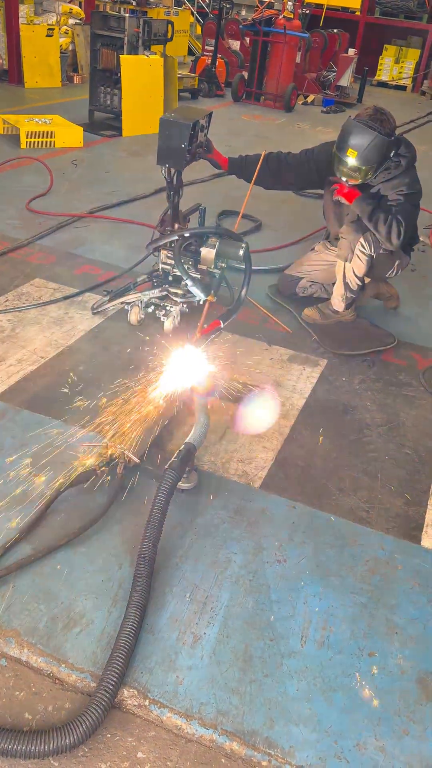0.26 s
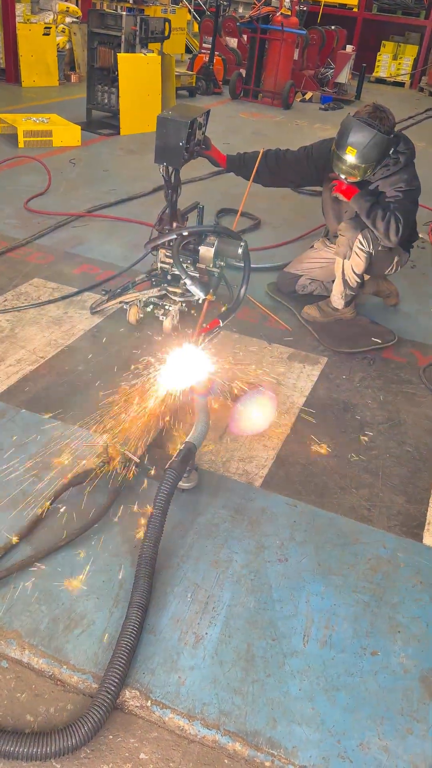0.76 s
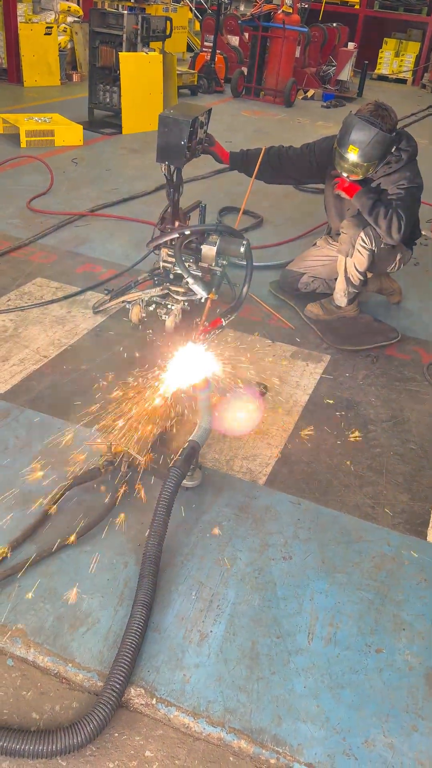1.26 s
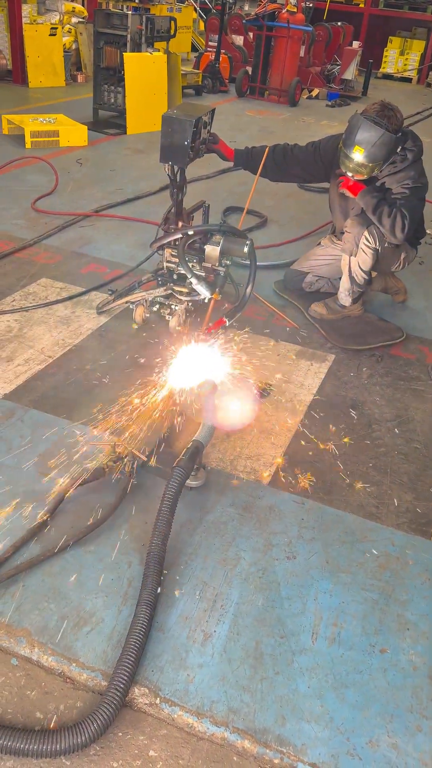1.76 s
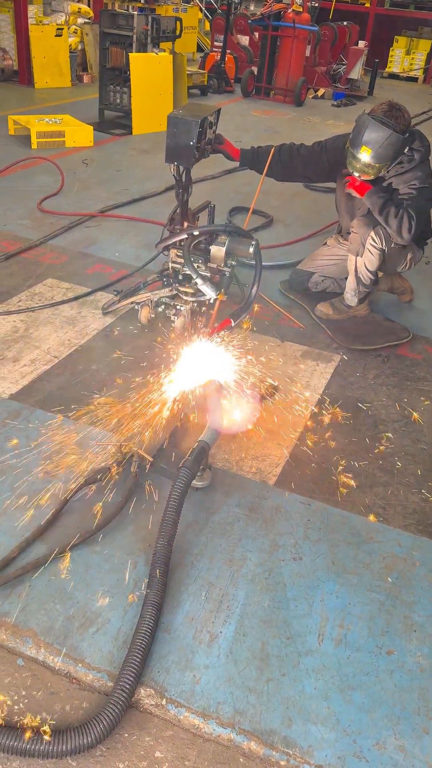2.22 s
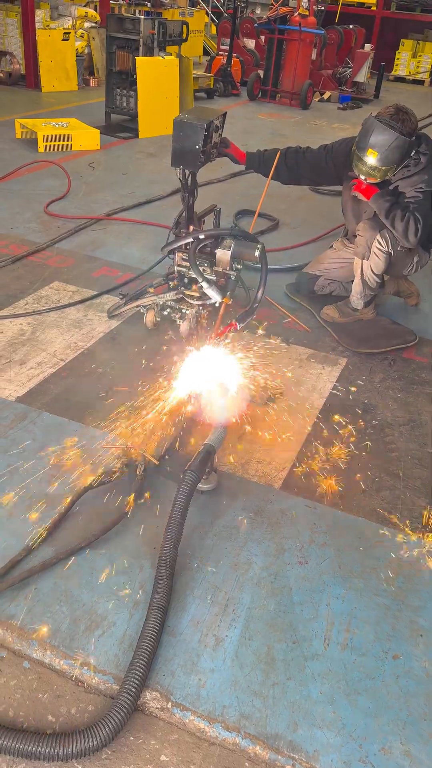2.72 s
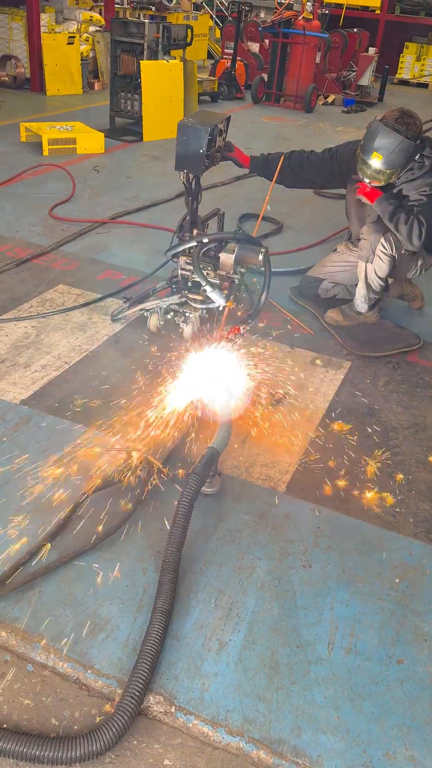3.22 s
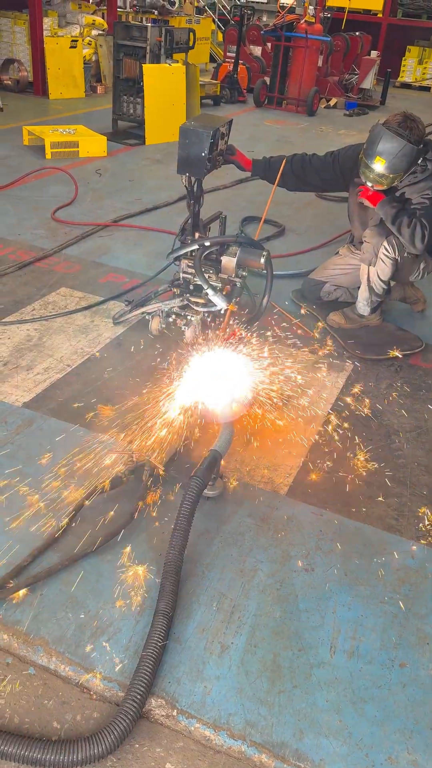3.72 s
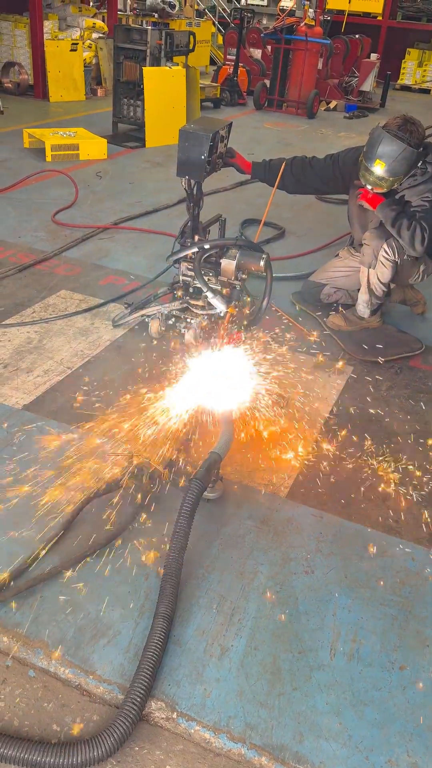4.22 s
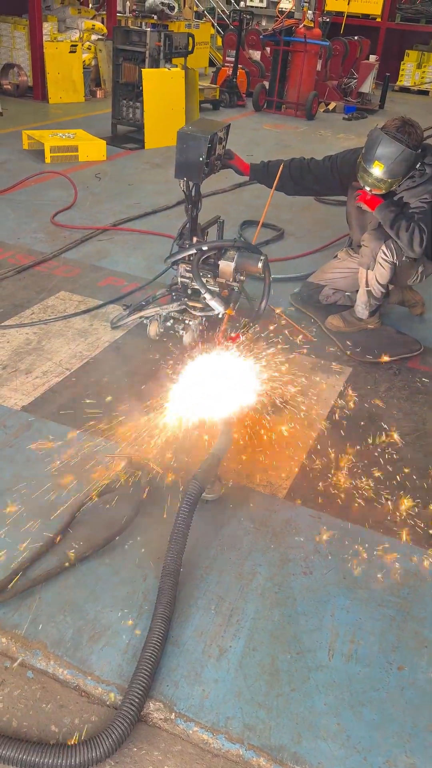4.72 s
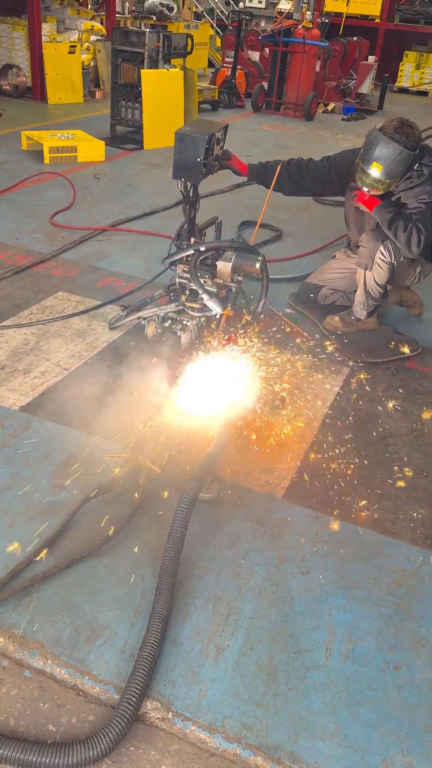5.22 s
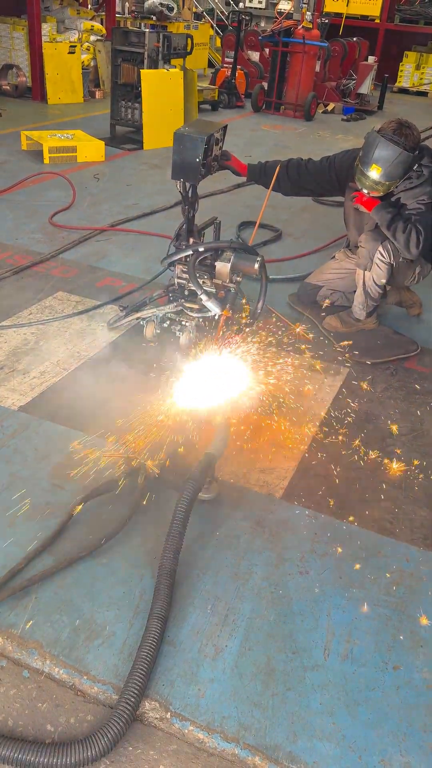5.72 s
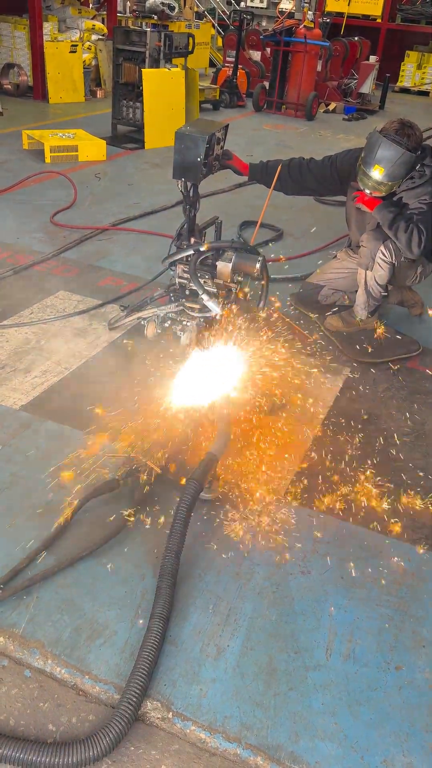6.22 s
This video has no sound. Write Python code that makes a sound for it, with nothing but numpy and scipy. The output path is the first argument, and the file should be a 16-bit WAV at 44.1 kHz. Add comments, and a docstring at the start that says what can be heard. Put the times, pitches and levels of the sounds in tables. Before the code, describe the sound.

Air-arc gouging on a steel plate, heard a few steps away in stereo in a large workshop. A harsh, dense crackle and bright air hiss run without pause from the start. Faint electrical hum and motor drone swell early beneath them. Sharp snaps join after a second, the sputter turns coarsest midway, then the arc eases and the rushing air is choked near the end, leaving a thinner crackle.

```python
"""Air carbon arc gouging on a steel plate in a workshop, a few steps from a pair of microphones.
From the start the hall rumbles, bursts of melt crackle in arc, groove and spray, and noise makes the air's roar.
Gusts swell the noisy roar, mostly early. A droning motor and the rectifier's ripple hum, both sine tones, also
swell early, the drone again later. Small spits run throughout; after a second loud snaps join in, clicks with a
fizz. The melt is coarsest in mid cut; then the arc eases and the groove's air is choked for a second as smoke rises."""
import sys
import numpy as np
from scipy import signal
from scipy.fft import rfft, irfft, next_fast_len
from scipy.io import wavfile

SR = 44100
rng = np.random.default_rng(int(sys.argv[2]) if len(sys.argv) > 2 else 0)


def wav_record(signal):
    """Record a signal, one row per channel, as 16-bit PCM in the file named by sys.argv[1]."""
    frames = np.transpose(np.atleast_2d(signal))
    bounded = np.clip(frames, -1, 1)
    # unit amplitude maps onto the largest positive 16-bit level
    quanta = np.round(bounded * 32767).astype(np.int16)
    wavfile.write(sys.argv[1], SR, quanta)


N = 285327
TIME = np.arange(N) / SR
SIZE = next_fast_len(N + SR)
HZ = np.maximum(np.arange(SIZE // 2 + 1) * SR / SIZE, 1)

# Source levels are before the trims in scene(); each source spectrum is a shape, scaled to unit rms.
# how hard the arc burns, easing as the cut goes on: t/s, level/dB
BURN = [(0.0, -18.5), (1.2, -19.5), (1.32, -20), (1.65, -19.5), (1.95, -20), (2.2, -22.5), (3.1, -22.5),
        (3.4, -22), (3.75, -23), (4.15, -23), (4.7, -25), (5.1, -25), (5.55, -27.5), (5.85, -26.5),
        (6.2, -27), (6.47, -28)]
# the arc flares as it bites into fresh steel: t/s, rise/dB, length/s
FLARES = [(.115, 2, 0.11), (.36, 1.5, .03), (.407, 1.5, .03), (.762, 1.5, .052), (1.16, 1.7, .07),
          (1.212, 2.5, .025), (1.636, 2, 0.049), (2.122, 3.5, .04), (2.465, 3.3, 0.12), (2.578, 1, .035),
          (2.635, 0.5, .04), (2.71, 1.7, 0.03), (2.786, 2.5, .02), (3.405, 2.5, .028), (3.53, 2.5, 0.049),
          (3.594, 3, .018), (3.628, 2, .018), (3.666, 2.5, .02), (3.712, 6.5, 0.016), (3.785, 4.5, .025),
          (3.83, 4, .02), (4.07, 1, .025), (4.324, 1, .15), (4.618, 3, .02), (5.198, 3, .045),
          (5.494, 3.5, .04), (5.723, 3.5, .03), (5.84, 1.3, 0.15), (6.11, 0, .1)]
# the arc falters as its gap widens: t/s, change/dB, length/s
FALTERS = [(.02, -1.5, 0.049), (.185, -0.5, .03), (.305, -3, 0.049), (.694, -1.5, .045), (1.095, -2.5, .03),
           (1.283, -3.5, .055), (1.471, -1.5, .03), (2.043, -2.5, .065), (2.36, -1.5, .06),
           (2.536, -4.5, 0.058), (2.848, -2.5, .065), (3.151, -1.5, .065), (3.454, -2, 0.092),
           (3.94, -2.5, .04), (4.099, -2.5, 0.031), (4.177, -4, .065), (4.422, -3.5, 0.078),
           (4.723, -1.5, 0.11), (5.356, -3, 0.05), (5.444, -2.5, .045), (5.545, -3, .07), (5.66, -1, .03),
           (5.974, -1, .03), (6.24, -2, 0.13)]
# how coarsely the melt sputters, most in mid cut: t/s, factor on the share of bursts/1
COARSENESS = [(0, 0.77), (1.5, 0.97), (2.6, 1.27), (3.6, 1.33), (4.4, 1.05), (5.2, 1.03), (6.47, 0.9)]
# the jet, choked for a second as smoke rises: t/s, level of air rushing in the groove/dB, level of spray hiss/dB
JET = [(0, -21, -23.5), (.25, -25, -26), (1.9, -25, -26.5), (2.2, -28.5, -27), (2.36, -31, -27.5),
       (2.46, -28, -27), (3.1, -28.5, -28), (3.55, -27, -27), (4.0, -28.5, -29.5), (4.36, -29, -28.5),
       (4.41, -30, -31), (4.5, -27.5, -30.5), (4.65, -30, -30), (5.03, -27.5, -27.5), (5.25, -39, -31),
       (5.33, -32, -29.5), (5.5, -51, -33), (5.55, -44, -33), (5.63, -43, -30.5), (5.85, -38, -31),
       (6.05, -39, -32.5), (6.2, -38, -31.5), (6.28, -34, -31), (6.34, -33, -30), (6.47, -38, -31.5)]
# top treble of the spray, relative: t/s, level/dB
FINENESS = [(0, -6), (1.5, -4.5), (2.5, -2.5), (3.0, -4), (3.8, -4.5), (4.4, -8), (5.0, -6.5), (5.6, -8),
            (6.47, -8)]
# roar of the air stream: t/s, level/dB
ROAR = [(0, -35.5), (1.2, -37.5), (1.3, -38.5), (1.95, -38.5), (2.1, -41), (2.8, -39.5), (3.1, -41.5),
        (3.45, -39.5), (3.65, -39.5), (4.15, -41), (4.35, -41), (5.0, -41), (5.5, -41.5), (5.8, -42),
        (6.15, -42.5), (6.33, -40), (6.47, -43)]
# gusts in the air stream: t/s, rise/dB, length/s
GUSTS = [(.12, 1.5, .08), (.62, 2.5, .07), (.76, 1, .04), (1.04, 3.5, .07), (4.59, 2.5, .07)]
# swells of the motor's drone: t/s, rise/dB, length/s
DRONE_SWELLS = [(.15, 9, .15), (.8, 7, .25), (1.54, 11, .3), (3.02, 6, .14), (3.38, 3, .25), (4.47, 4, .2)]
# hum of the rectifier's ripple: t/s, level/dB
HUM = [(0, -55), (.25, -51.5), (.72, -54.5), (.8, -49), (1.23, -50), (1.3, -58), (1.42, -55.5),
       (1.95, -57.5), (2.15, -64), (3.2, -62), (3.45, -61), (4.1, -59.5), (4.5, -66), (4.95, -60),
       (5.5, -69), (5.85, -66), (6.47, -63)]
# loud snaps of the arc, before the band filter: t/s, level/dB
SNAPS = [(1.0587, -4), (1.1164, -4), (1.214, -5), (1.4866, -4), (1.9904, -4), (2.1147, -2), (2.1246, -3),
         (2.2244, 1), (2.2584, -6), (2.4686, 0), (2.6192, -3), (2.6276, -3), (2.6494, -5), (2.7078, -2),
         (2.7869, -4), (3.0154, -4), (3.3256, -6), (3.408, -4), (3.4158, -4), (3.4668, -3), (3.5087, -6),
         (3.5199, -3), (3.555, 3), (3.5765, -3), (3.5947, -7), (3.6667, -2), (3.7087, -5), (3.7923, -4),
         (3.8965, 0), (4.0276, -4), (4.05, -4), (4.0595, -5), (4.2214, -5), (4.5746, -6), (4.6174, -10),
         (4.9, -5), (5.0846, -5), (5.5024, -8), (5.5996, -8)]
# colour of the low hall rumble: f/Hz, density/dB per Hz
RUMBLE_SPECTRUM = [(20, -30), (50, -7), (80, -1), (130, -3), (190, 1), (270, -6), (600, -28)]
# colour of the arc: f/Hz, density/dB per Hz
ARC_SPECTRUM = [(150, -50), (500, -28), (1000, -16.5), (1400, -13), (2100, -1.1), (2600, -0.5), (3000, 1.1),
                (4200, -0.84), (5000, -11.5), (5600, -3), (7000, -8), (16000, -29.5)]
# colour of the air in the groove: f/Hz, density/dB per Hz
GROOVE_SPECTRUM = [(500, -69), (3500, -36.5), (4800, 1), (5500, 3), (5900, 2), (6500, 0.5), (7200, -12.5),
                   (9000, -22)]
# colour of the steel spray: f/Hz, density/dB per Hz
SPRAY_SPECTRUM = [(300, -55), (2500, -22), (5000, -7), (7200, -2.5), (8700, 0), (9700, -.7), (11000, -.7),
                  (12200, -3.5), (13400, -6.5), (15000, -2), (16000, -2)]
# colour of the air stream: f/Hz, density/dB per Hz
STREAM_SPECTRUM = [(15, -50), (30, -29), (50, -14), (90, -12), (160, -5.5), (250, -8), (350, -2.5),
                   (600, 2), (900, 0.5), (1400, 4), (3000, -18.5)]
# peaks and dips from plate, carriage and floor:
# f/Hz, width/Hz, level with short groove/dB, level with long groove/dB, glide over the cut/Hz
SURROUNDINGS = [(434, 39, 5.5, 3, -2), (510, 40, -4.0, -0.5, 11), (660, 42, -4.5, -3.0, -9),
                (820, 290, 2.5, 5, 79), (1006, 100, -5, -7, 30), (1230, 45, 2.0, 4, -40),
                (1313, 130, 5, -1, -35), (1416, 52, -6.5, 3, 19), (1530, 58, 6.5, 5, -18),
                (1687, 62, 3, 7, -87), (1780, 67, -1, -0.5, -54), (1962, 83, -1, 6.5, -163),
                (1988, 71, 5.5, 4, -34), (2152, 47, -2, 6, -26), (2357, 55, 2, 4, -28),
                (2530, 41, 2.5, 0, 5), (2765, 260, 3.0, 2.5, 34), (2925, 77, 2.0, 3, -11),
                (3101, 106, -3.5, -6, -46), (3330, 200, 3, 2.0, 98), (3710, 93, 2.5, -4, -93),
                (4030, 87, 3, 1.5, 45), (4170, 2100, -3.5, 1.5, 1777), (4552, 202, 5, 2.5, 152),
                (4640, 152, 0.5, -2.5, 224), (4930, 149, -5, 3, -41), (5900, 207, 1.5, -2.5, 126),
                (6280, 130, -4, 3.5, 56), (7112, 301, -0.5, -1, -688), (7192, 112, 0.5, 0, -399),
                (7466, 74, -3.5, 5, 25), (7700, 940, -3.0, -1.0, -256), (9562, 250, -2, 2.5, -305)]
# near reflections that move with the torch: delay/s, delay gained over the cut/s, start gain/1, end gain/1
ECHOES = [(.002421, .00005, .13, -.03), (.00251, .000084, -.1, .04), (.00283, .00005, -.03, -.02),
          (.00315, .00025, .02, .05), (.0128, .0002, .08, .08)]
# microphone pair: f/Hz, left minus right level/dB, coherence/1, left lead/rad
PAIR = [(200, 0, 1, 0), (500, -1.4, .98, 0), (900, -3.6, .95, 0), (1400, -1.8, .95, .1),
        (2100, -2.4, .93, .15), (2700, 1.2, .85, .7), (3200, 3.3, .68, .15), (4200, 2.6, .8, -.5),
        (4700, 1, .6, -1.2), (5030, 3, .25, -2.4), (5250, 1, .55, -.25), (5700, 0, .97, -.05),
        (6700, 0, .96, -.15), (7300, 0, .85, -.7), (10800, 0, .88, -2.45), (11900, 0, .97, -3.05),
        (13700, 0, .97, -3.2), (15300, 0, .84, -4.2)]

GROOVE_FLARES, SPRAY_FLARES, ROAR_FALTERS = 0.4, 0.21, 0.55  # share of a flare or falter each part takes up
BODY_HZ, BODY_LOSS_DB = 2150, 7  # the arc's lower body: upper edge, and loss per unit of coarseness above 1
MAINS_HZ, MOTOR_HZ, FAN_HZ = 49.95, 97.17, 335.5
THROB_S = 3.03  # where the tones nearly align in phase, so that motor and mains hum swell together
WANDER_HZ = 14
HUM_BLUR = .3  # how much a coarse melt roughens the hum
SNAP_S, SNAP_FIZZ = 0.00062, 0.63  # fizz after a snap: decay time in s, and factor on its size
FLARE_SPITS = 2.5  # dB more spits a second for each dB of flare
FLURRY_HZ, FLURRY_DB = 69.8, 7.5  # how fast and how far the rate of spits swings
SHOP_T60_S = 0.76
CUTOFF_HZ = 15750


def from_db(db):
    """Decibels to gain."""
    return 10 ** (np.asarray(db) / 20)


def rms_one(x):
    """Scale to unit rms."""
    return x / np.sqrt(np.mean(x ** 2) + 1e-20)


def in_time(rows):
    """Each column of a curve at every sample."""
    s, *columns = np.transpose(rows)
    return [np.interp(TIME, s, c) for c in columns]


def in_frequency(rows):
    """Each column of a spectrum at every frequency, interpolated over log frequency."""
    hz, *columns = np.transpose(rows)
    return [np.interp(np.log(HZ), np.log(hz), c) for c in columns]


def filtered(x, response):
    """Pass a signal through a frequency response."""
    return irfft(rfft(x, SIZE) * response, SIZE)[..., :N]


def causal(db):
    """Minimum-phase response for a gain curve: it rings only after the cause."""
    cepstrum = irfft(np.log(from_db(db)), SIZE)
    cepstrum[1:SIZE // 2] *= 2
    cepstrum[SIZE // 2 + 1:] = 0
    return np.exp(rfft(cepstrum))


def drift(rate):
    """Slow chance with spread 1."""
    return rms_one(filtered(rng.standard_normal(SIZE), 1 / (1 + (HZ / rate) ** 2)))


def wander(depth_db):
    """A level wavers at random several times a second."""
    return depth_db * drift(WANDER_HZ)


def swells_db(rows):
    """Each swell is a smooth rise and fall of level, down to a sixth of its dB at the ends of its length."""
    return sum(db * np.exp(-np.pi * (1.5 * (TIME - s) / length) ** 2) for s, db, length in rows)


def tone(hz, waver):
    """A slightly unsteady hum line; rms about 1."""
    phase = 2 * np.pi * hz * (TIME - THROB_S) + waver * drift(2.6)
    return np.sqrt(2) * np.sin(phase)


def voice(bursts, grain, spectrum, flutter_db):
    """Turbulence with a share of bursts, in the colour of its source; rms 1."""
    grain = np.clip(grain, 0, 1)
    drive = np.sqrt(grain) * bursts + np.sqrt(1 - grain) * rng.standard_normal(N)
    drive = drive * from_db(flutter_db * drift(59))
    return rms_one(filtered(drive, causal(in_frequency(spectrum)[0])))


def shop_rumble(level_db):
    """A low rumble of the hall's machinery, in which the hums are half buried."""
    return from_db(level_db) * voice(0, 0, RUMBLE_SPECTRUM, flutter_db=1)


def sputter(per_s, spread_db, clump_db):
    """Tiny bursts of the melt: random clicks in short flurries, mostly small, a few large."""
    size_db = spread_db * np.minimum(rng.exponential(1, N), 5) + clump_db * drift(150)
    hits = rng.random(N) < per_s / SR
    return rms_one(hits * from_db(size_db) * rng.choice([-1, 1], N))


def arc_power(ripple, imbalance, unrest_db):
    """A three-phase rectifier ripples six times a mains cycle, unequal phases twice; the arc also wanders."""
    turn = 2 * np.pi * MAINS_HZ * TIME
    six, two, four = np.cos(6 * turn), np.cos(2 * turn), np.sin(4 * turn)
    power = 1 + ripple * six + imbalance * (two + .5 * four)
    return power * from_db(unrest_db * drift(22))


def gouge(arc_trim_db, groove_trim_db, spray_trim_db):
    """The same bursts crackle in the arc, the groove and the spray; all flare and pulse with the arc's power."""
    burn_db, = in_time(BURN)
    groove_db, spray_db = in_time(JET)
    flare = swells_db(FLARES) + swells_db(FALTERS)
    coarse, = in_time(COARSENESS)
    bursts = sputter(per_s=3000, spread_db=2.5, clump_db=2.0)

    arc_db = burn_db + arc_trim_db + flare + wander(depth_db=-0.1)
    arc = from_db(arc_db) * voice(bursts, 0.36 * coarse, ARC_SPECTRUM, flutter_db=0.5)
    # a coarse melt thins the arc's lower body
    body = filtered(arc, 1 / (1 + (HZ / BODY_HZ) ** 8))
    arc = arc + (from_db(BODY_LOSS_DB * (1 - coarse)) - 1) * body

    groove_db = groove_db + groove_trim_db + GROOVE_FLARES * flare + wander(depth_db=0.9)
    groove = from_db(groove_db) * voice(bursts, 0.65 * coarse, GROOVE_SPECTRUM, flutter_db=0.6)

    spray_db = spray_db + spray_trim_db + SPRAY_FLARES * flare + wander(depth_db=0.47)
    spray = from_db(spray_db) * voice(bursts, 0.16 * coarse, SPRAY_SPECTRUM, flutter_db=0.88)
    finest = filtered(spray, 1 / (1 + (11000 / HZ) ** 8))
    spray = spray + (from_db(in_time(FINENESS)[0]) - 1) * finest
    return (arc + groove + spray) * arc_power(ripple=0.065, imbalance=0.029, unrest_db=0.29)


def air_roar(waver_db):
    """Large eddies of the air stream; they come in gusts and sag when the arc falters."""
    level_db = in_time(ROAR)[0] + swells_db(GUSTS) + ROAR_FALTERS * swells_db(FALTERS) + wander(waver_db)
    return from_db(level_db) * voice(0, 0, STREAM_SPECTRUM, flutter_db=0.24)


def machines(motor_db, transformer_db, overtone_db, fan_db):
    """A motor runs just below the transformer's hum, so the two throb together; a faint fan tone lies above."""
    motor_level_db = motor_db + swells_db(DRONE_SWELLS) + wander(depth_db=2)
    motor = from_db(motor_level_db) * tone(MOTOR_HZ, waver=0.19)
    transformer = from_db(transformer_db) * tone(2 * MAINS_HZ, waver=0.11)
    overtone = from_db(overtone_db) * tone(4 * MAINS_HZ, waver=0.18)
    fan = from_db(fan_db) * tone(FAN_HZ, waver=0.34)
    return motor + transformer + overtone + fan


def ripple_hum(waver_db):
    """The rectifier's ripple hums at six times the mains rate; it swells early, then blurs and sinks into the roar."""
    blur = 1 + HUM_BLUR * in_time(COARSENESS)[0] ** 2 * drift(15)
    level_db = in_time(HUM)[0] + wander(waver_db)
    return from_db(level_db) * blur * tone(6 * MAINS_HZ, waver=0.33)


def snaps(level_db, per_s, spit_db, spread_db):
    """Single large drops short the arc and crack; smaller ones spit in flurries, more in a coarse melt or a flare."""
    rate_db = FLURRY_DB * drift(FLURRY_HZ) + FLARE_SPITS * swells_db(FLARES)
    rate = per_s * in_time(COARSENESS)[0] ** 3 * from_db(rate_db)
    spits = (rng.random(N) < rate / SR) * rng.choice([-1, 1], N)
    clicks = spits * from_db(in_time(BURN)[0] + spit_db + spread_db * rng.uniform(-1, 1, N))
    for s, db in SNAPS:
        clicks[int(s * SR)] = -from_db(db + level_db)
    # the clicks' energy fades and sets the size of the fizz
    fade = np.exp(-2 / (SNAP_S * SR))
    energy = signal.lfilter([1 - fade], [1, -fade], clicks ** 2 + 1e-18)
    fizz = np.sqrt(energy) * rng.standard_normal(N)
    band = signal.butter(2, [1700, 11000], "band", fs=SR, output="sos")
    return signal.sosfilt(band, clicks + SNAP_FIZZ * fizz)


def bells(rows):
    """Gain in dB of a set of resonances and dips."""
    return sum(db / (1 + (2 * (HZ - hz) / width) ** 2) for hz, width, db in rows)


def along_the_plate(x, count=5):
    """As the carriage lengthens the groove, near echoes shift and the peaks and dips that colour the torch glide."""
    travel, out = TIME / TIME[-1], 0
    x = x + sum((first + (last - first) * travel) * np.interp(TIME - delay - gained * travel, TIME, x, left=0)
                for delay, gained, first, last in ECHOES)
    # crossfade between fixed colours at evenly spaced places
    for place in np.linspace(0, 1, count):
        colour = bells([(hz + glide * place, width, short + (long - short) * place)
                        for hz, width, short, long, glide in SURROUNDINGS])
        nearness = np.maximum(1 - np.abs(travel - place) * (count - 1), 0)
        out = out + nearness * filtered(x, causal(colour))
    return out


def shop_tail():
    """Response of one diffuse decay of the hall, with unit energy."""
    t = TIME[:SR]
    tail = rng.standard_normal(SR) * from_db(-60 * t / SHOP_T60_S) * (t > .004)
    return rfft(tail / np.sqrt(np.sum(tail ** 2)), SIZE)


def at_microphones(x, hall_db):
    """Both microphones share direct sound, near echoes and a tail, apart in phase; each adds its own diffuse sound."""
    balance_db, alike, lead = in_frequency(PAIR)
    alike = np.clip(alike, 0, 1)
    side = np.array([[.5], [-.5]])  # left, right
    shared = (1 + from_db(hall_db) * shop_tail()) / np.hypot(1, from_db(hall_db))
    own = np.array([shop_tail(), shop_tail()])
    pair = np.sqrt(alike) * shared * np.exp(1j * side * lead) + np.sqrt(1 - alike) * own
    return filtered(x, pair * from_db(side * balance_db))


def scene():
    """The gouging in its hall, a few steps off, over hums and rumble that are equal in both microphones."""
    torch = gouge(arc_trim_db=-2.5, groove_trim_db=-0.5, spray_trim_db=8.5)
    torch = torch + air_roar(waver_db=0.94)
    torch = torch + snaps(level_db=4.5, per_s=130, spit_db=12.0, spread_db=2)
    hums = machines(motor_db=-66.0, transformer_db=-65.5, overtone_db=-67.5, fan_db=-61.5)
    hums = hums + ripple_hum(waver_db=0.2)
    return at_microphones(along_the_plate(torch), hall_db=-13.5) + hums + shop_rumble(level_db=-64)


def record(dry):
    """The top is cut steeply, over 100 Hz."""
    return filtered(dry, np.clip((CUTOFF_HZ - HZ) / 100 + .5, 0, 1))


dry = scene()
out = record(dry)
wav_record(out)
```